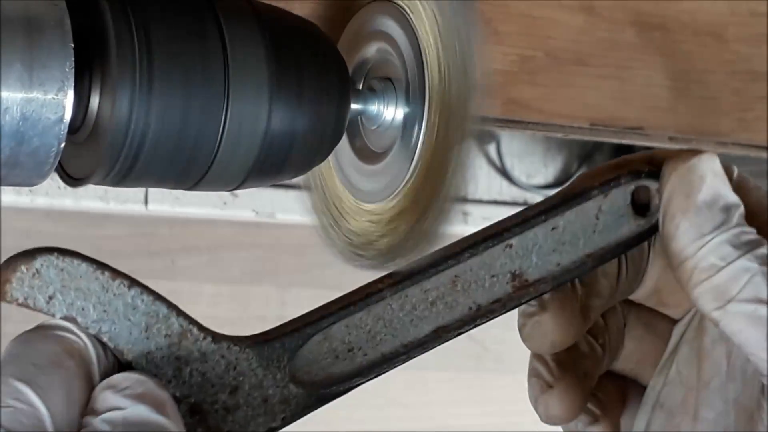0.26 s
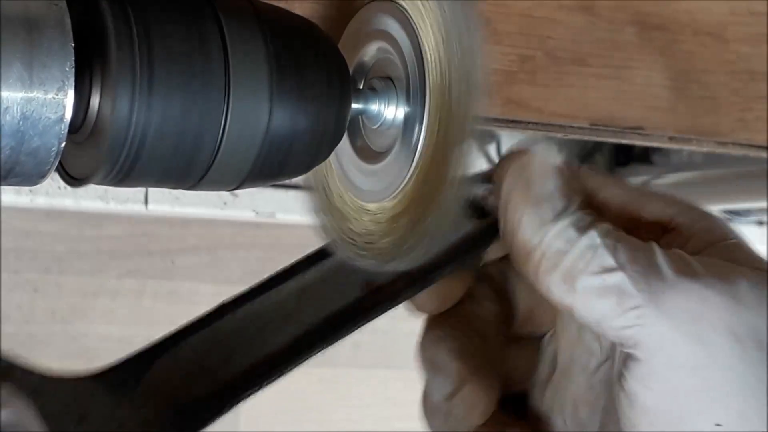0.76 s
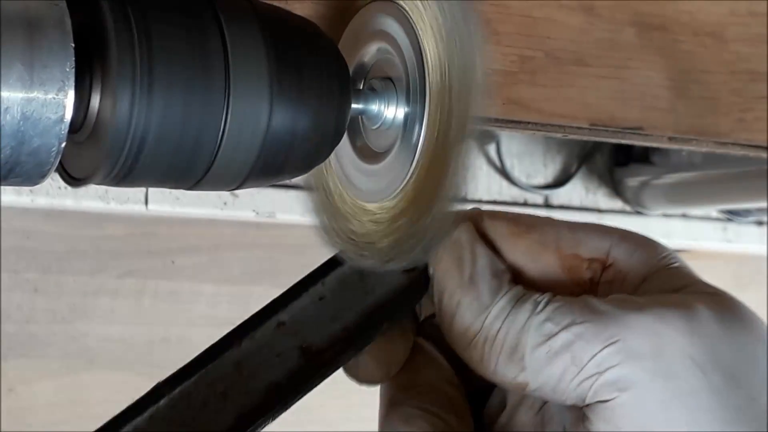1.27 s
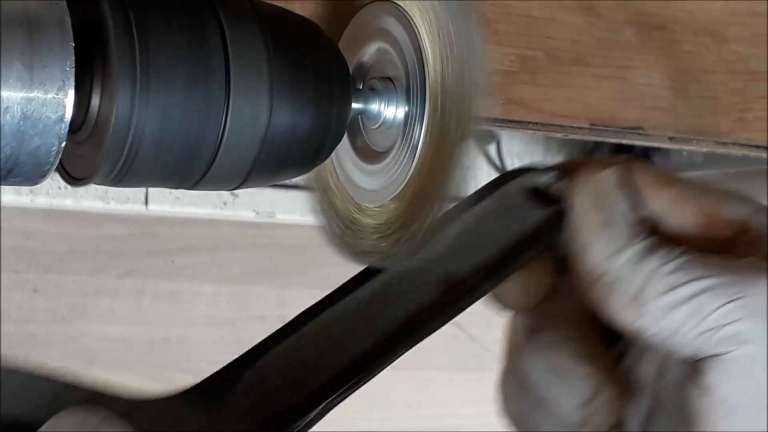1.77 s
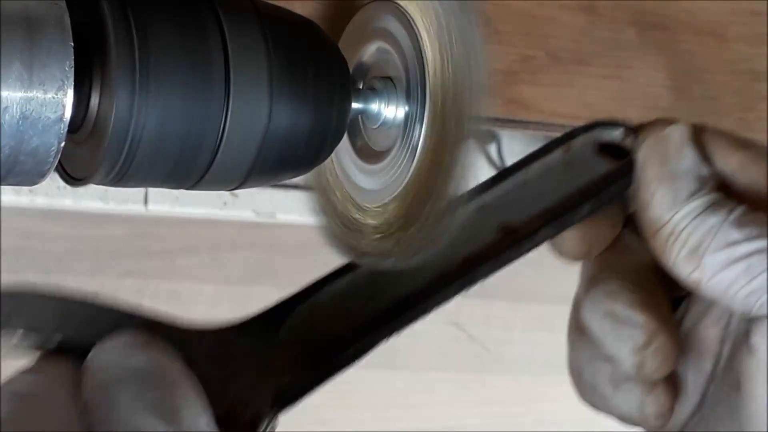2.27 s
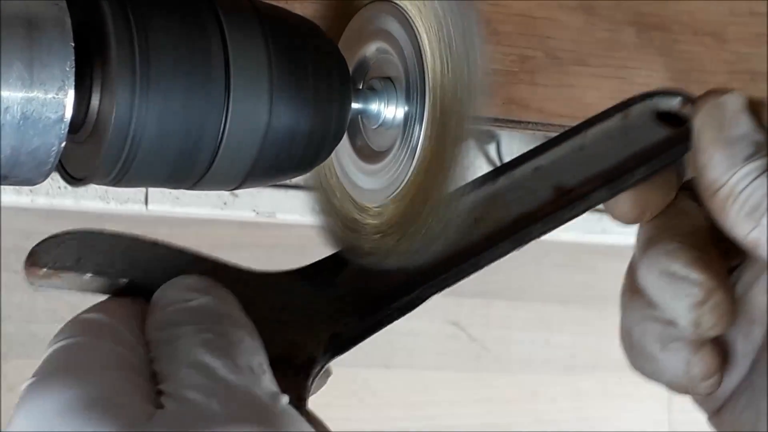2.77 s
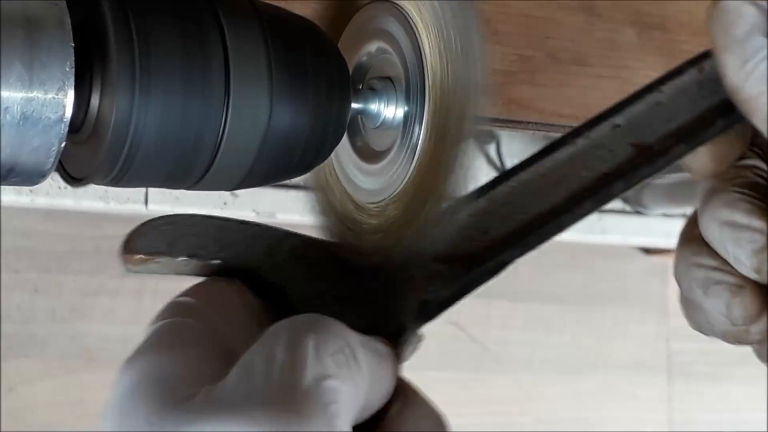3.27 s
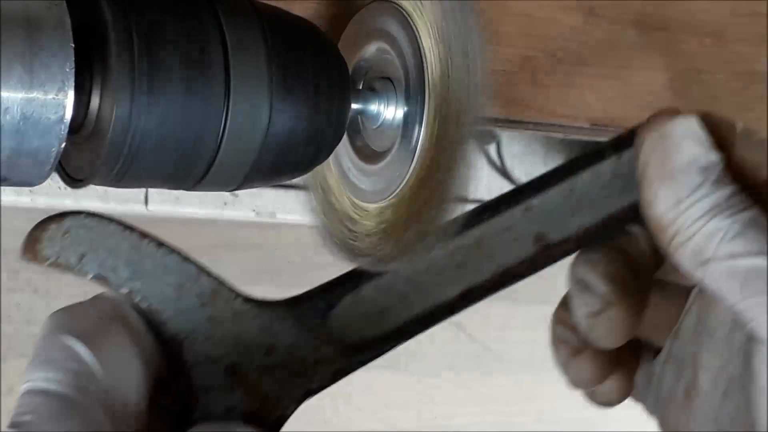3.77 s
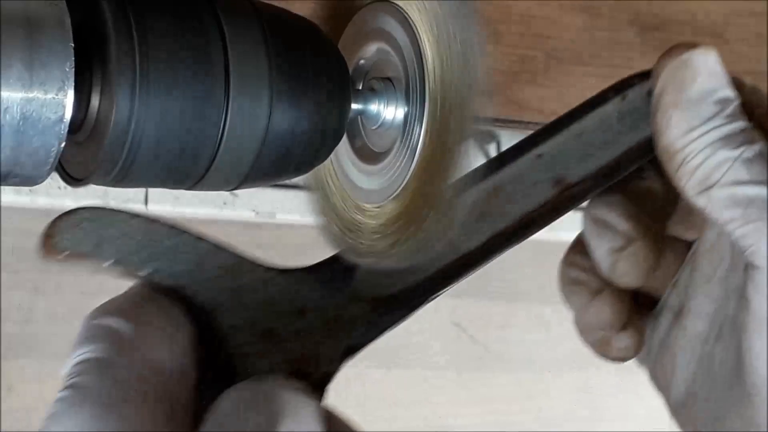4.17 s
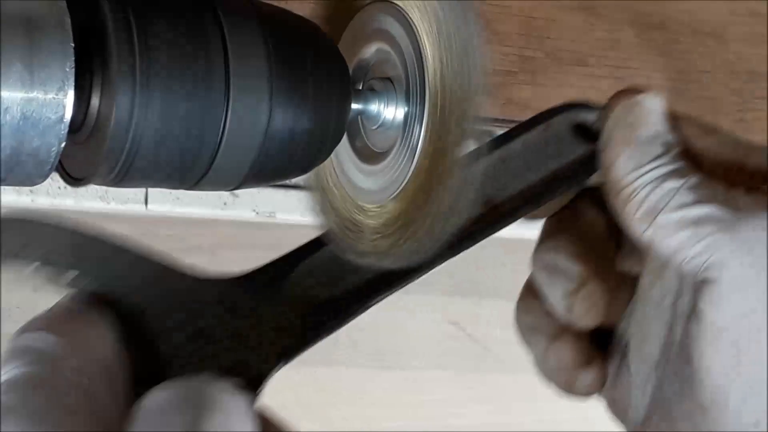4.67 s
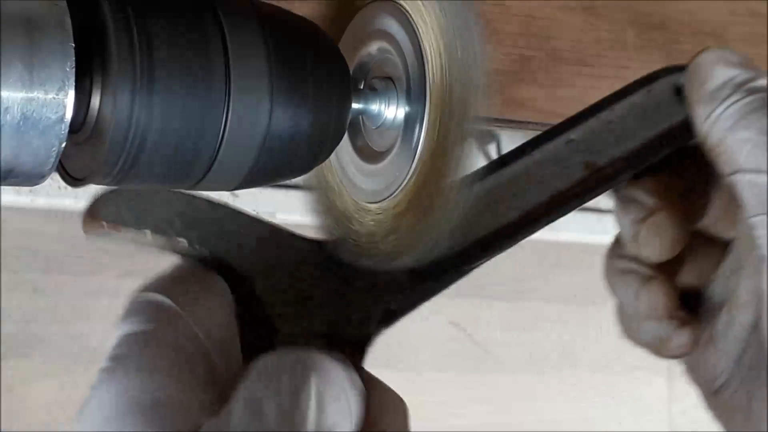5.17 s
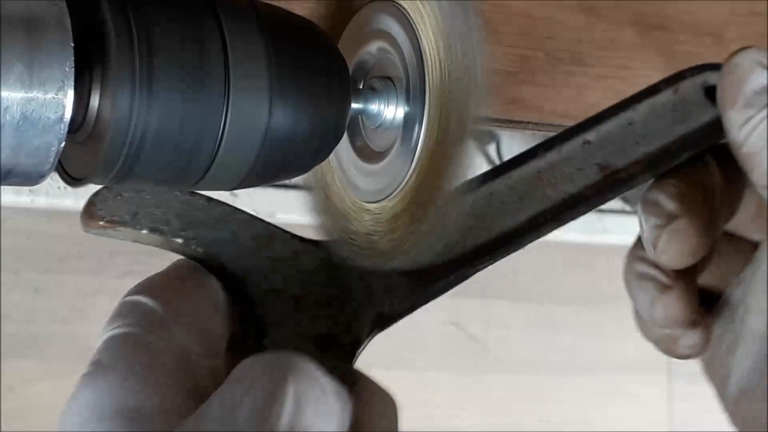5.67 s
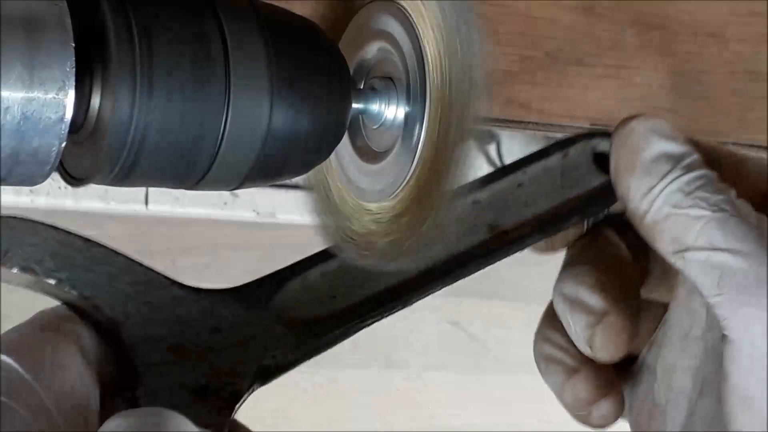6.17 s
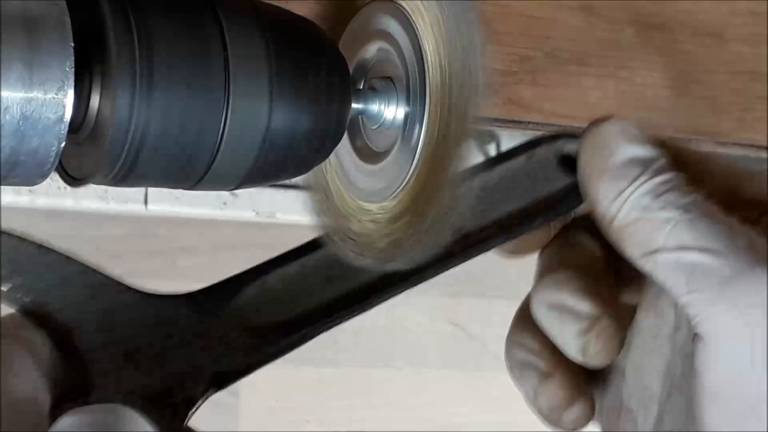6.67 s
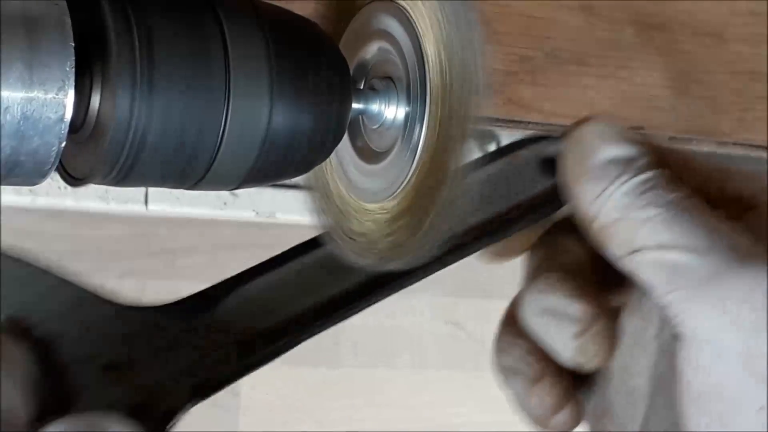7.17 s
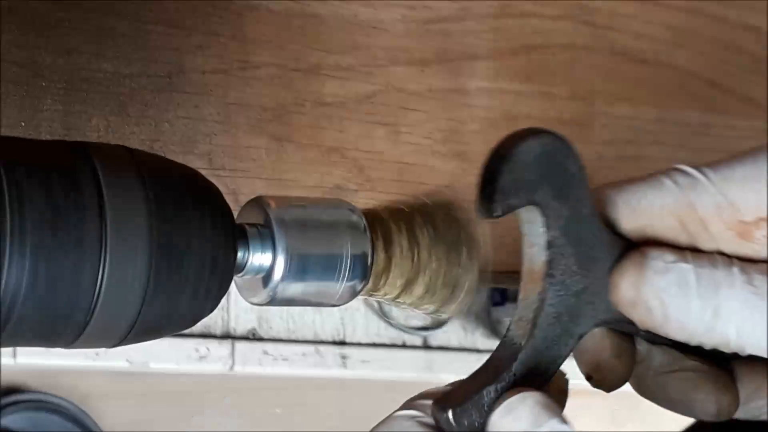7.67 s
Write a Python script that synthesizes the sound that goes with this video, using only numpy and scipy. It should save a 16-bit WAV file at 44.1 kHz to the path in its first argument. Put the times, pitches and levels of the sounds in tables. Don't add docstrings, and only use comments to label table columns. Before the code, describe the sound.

Dry, close workshop sound, almost the same at both ears. From 0 to 0.6 s a drill runs nearly unloaded: clear, steady mid and high whines over airy motor rush, with fan wind rumbling and popping low on the microphone. At about 0.6 s rusty steel meets the wire wheel; a dull gritty crackle peaks near 0.7 s, then bright hiss and metallic rasp continue. The pitch dips slightly, a low rotor hum swells and the gears grow rougher, wavering with every push up to 3.7 s. Around 3.75 s the pressure releases, speed rises and the scrape fades; from 4.1 s it bites again and scours on to 7.6 s with small surges and irregular air puffs. At 7.62 s a soft thump marks an abrupt change: a small end brush grinds lower and grittier under altered high whines until 7.9 s.

```python
import sys
import numpy as np
from scipy import signal
from scipy.fft import rfft, irfft, next_fast_len
from scipy.io import wavfile
from scipy.ndimage import map_coordinates

SR = 44100
rng = np.random.default_rng(int(sys.argv[2]) if len(sys.argv) > 2 else 0)


def store_pcm(level_fs):
    pcm = np.round(np.clip(level_fs, -1, 1) * 32767).astype(np.int16)
    wavfile.write(sys.argv[1], SR, np.atleast_2d(pcm).T)


def to_linear_factor(level_db):
    exponent = np.asarray(level_db, float) / 20
    return 10 ** exponent


N = 349713
FREE_HZ = 394.8
SWAP_S = 7.623
COARSE = 16


def seconds():
    return np.arange(N) / SR


def curves(rows):
    s, *columns = np.transpose(rows)
    return [np.interp(seconds(), s, column) for column in columns]


def wobble(rate):
    knots = rng.standard_normal(int(N * rate / SR) + 2)
    return np.interp(np.arange(N) * rate / SR, np.arange(len(knots)), knots)


def coloured(x, spectrum, modes=()):
    m = next_fast_len(N + 8192)
    f, db = np.transpose(spectrum)
    hz = np.fft.rfftfreq(m, 1 / SR)
    level_db = np.interp(np.log(hz + 1), np.log(f), db, left=-120)
    for centre, width, top_db in modes:
        level_db += top_db / (1 + (2 * (hz - centre) / width) ** 2)
    return irfft(rfft(x, m) * to_linear_factor(level_db), m)[:N] * np.sqrt(SR / 2)


def band(x, edges_hz):
    kept = signal.sosfilt(signal.butter(2, edges_hz, "band", fs=SR, output="sos"), x)
    return kept / kept.std()


# start_s, speed_turns_per_s
ROTOR_SPEED = [(0, 395.0), (.55, 394.6), (.64, 394.0), (.8, 391.7), (1.0, 394.0), (1.45, 393.1),
               (1.95, 394.2), (3.7, 393.8), (3.76, 397.4), (3.98, 396.3), (4.1, 393.6), (4.27, 392.2),
               (4.9, 394.9), (6.05, 393.4), (7.6, 394.6), (7.64, 395.0), (7.93, 395.1)]
# middle_s, speed_change_turns_per_s
HAND_WAVERS = [(1.29, 1.4), (1.4, 1), (1.79, -0.97), (2.09, 0.97), (2.19, 0.55), (2.33, -1.24), (2.51, 1.3),
               (2.58, -1.73), (2.66, 1.26), (2.87, -0.64), (2.98, 0.76), (3.13, 0.86), (3.21, 1.16),
               (3.3, 0.65), (3.37, 1.5), (3.54, 1.2), (4.17, 1.235), (4.35, 0.67), (4.85, -0.533),
               (5.2, -0.96), (5.3, -0.6), (5.39, -0.55), (5.5, 2), (5.661, 0.55), (5.89, 1.76),
               (6.34, 0.61), (6.52, 0.75), (7.45, -0.75)]
# start_s, gear_load (0-1.4), wire_contact (0-1)
HAND_PUSH = [(0, 0.1, 0.1), (.56, 0, 0.26), (.62, 0.26, 0.65), (.8, 0.76, 1.05), (1.0, 0.43, 1.05),
             (1.45, 0.88, 0.63), (1.95, 0.7, 1), (2.45, 0.99, 1.0), (3.725, 1.15, 0.79), (3.755, .15, 0.26),
             (3.98, 0, 0), (4.1, 0.41, 0.46), (4.27, 1.05, 0.93), (4.9, 0.98, .9), (6.05, 1.22, 0.89),
             (7.618, 1.02, 0.84), (7.626, .15, 0.62), (7.93, 0.2, .45)]


def hand():
    waver_s, load_per_turn, skip_load = .045, .13, .19
    skips_per_s, skip_from, skip_turns = 28, .65, 2.3
    t = np.arange(0, N + COARSE, COARSE) / SR
    waver = sum(turns * np.exp(-((t - s) / waver_s) ** 2) for s, turns in HAND_WAVERS)
    waver = waver.repeat(COARSE)[:N]
    load, contact = curves(HAND_PUSH)
    skip = skip_turns * np.clip(load, 0, 1) * np.maximum(wobble(skips_per_s) - skip_from, 0)
    press = np.clip(load * (1 - load_per_turn * waver - skip_load * skip), 0, 1.6)
    return press, np.clip(contact, 0, 2), curves(ROTOR_SPEED)[0], waver, skip


def rotor_time(press, turns):
    stumble = (.2 + press) * .0005 * wobble(40)
    return np.cumsum(turns / FREE_HZ + stumble) / SR


# pitch_hz, level_db_per_hz
DRAUGHT_SPECTRUM = [(15, -66), (30, -37), (55, -22.5), (110, -2), (190, 1), (330, -4), (500, -10.5),
                    (700, -28), (2000, -55)]
# start_s, level_db
FAN_AIR = [(0, -31.5), (.6, -33.5), (.95, -29), (1.6, -34.5), (2.65, -36), (4.05, -29.5), (6.5, -31),
           (7.2, -32.5), (7.93, -31.5)]
# middle_s, peak_db, pitch_hz
AIR_POPS = [(.023, -13.5, 306), (0.07, -11, 302), (.483, -12, 230), (.854, -12.5, 200), (.978, -7, 292),
            (1.1, -10.5, 330), (1.298, -8.5, 348), (1.353, -13.5, 301), (1.51, -12.5, 227),
            (2.776, -14, 280), (3.968, -10.5, 229), (4.148, -11, 272), (4.17, -8.5, 253.8),
            (4.232, -14, 308), (4.752, -10.5, 374), (5.01, -13, 213.7), (5.128, -15, 279), (5.33, -10, 404),
            (5.389, -11, 403), (6.1, -12, 311), (6.192, -8, 410), (6.433, -8.5, 379.3), (6.59, -11, 220),
            (6.64, -13, 205), (7.343, -10.5, 247), (7.608, -12, 228), (7.642, -10, 200),
            (7.674, -10.5, 278), (7.816, -7, 293.5), (7.912, -8, 250.4)]


def pop(hz, turn):
    t = np.arange(-SR // 50, SR // 50) / SR
    body = np.exp(-(t * hz / .48) ** 2) * np.cos(2 * np.pi * hz * t + turn)
    edge = np.exp(-(t * hz / .85) ** 2) * np.cos(2 * np.pi * 2.24 * hz * t + turn)
    return body + to_linear_factor(-15) * edge


def draught():
    small_count, small_over_db = 45, 16
    thump_db, thump_s = -26, .002
    lumps = to_linear_factor(4.8 * wobble(70) + 2.4 * wobble(18))
    rumble = coloured(rng.standard_normal(N) * lumps, DRAUGHT_SPECTRUM)
    air_db, = curves(FAN_AIR)
    small = []
    for when, size, pitch in rng.random((small_count, 3)):
        peak_db = air_db[int(when * N)] + small_over_db + 2 * size
        small.append((when * N / SR, peak_db, 140 + 140 * pitch))
    length = len(pop(200, 0))
    out = np.zeros(N + 2 * length)
    for s, db, hz in list(AIR_POPS) + small:
        start = round(s * SR) + length // 2
        out[start:start + length] += to_linear_factor(db) * pop(hz, turn=rng.normal(1.68, 1))
    low_cut = signal.butter(2, 75, "high", fs=SR, output="sos")
    pops = signal.sosfiltfilt(low_cut, out)[length:-length]
    thump = to_linear_factor(thump_db) * np.exp(-((seconds() - SWAP_S) / thump_s) ** 2)
    return to_linear_factor(air_db + 3.5) * rumble / rumble.std() + pops + thump


# pitch_hz, level_db_per_hz
RUSH_SPECTRUM = [(400, -64), (1000, -71), (1400, -69), (1600, -62.5), (2400, -65), (3200, -61), (4000, -62),
                 (5000, -58.5), (7000, -59), (8500, -58), (10300, -62), (10700, -69), (12200, -73.5),
                 (14500, -67)]
# pitch_hz, width_hz, level_db
BENCH_DIPS = [(620, 160, -3), (1950, 120, -3), (2220, 120, -3), (2650, 250, -4), (3600, 300, -4),
              (4400, 280, -5), (5120, 120, -4), (6050, 350, -4), (7500, 250, -4), (8200, 300, -4),
              (8950, 200, -4), (9950, 200, -2)]


def motor(clock):
    size = round(9 * SR / FREE_HZ)
    place = clock * FREE_HZ / 9 * size % size
    repeat = map_coordinates(rng.standard_normal(size), [place], mode="grid-wrap")
    share = .42
    mix = share * repeat + np.sqrt(1 - share ** 2) * rng.standard_normal(N)
    return coloured(mix * to_linear_factor(1.1 * wobble(40)), RUSH_SPECTRUM, BENCH_DIPS)


# low_hz, high_hz
RUST_BAND = (1110, 2600)
# low_hz, high_hz
GRIND_BAND = (1050, 1420)


def crust():
    touch_s, lasts_s, touch_db, grind_db = .73, .18, -33, -40
    t = seconds()
    grit = rng.standard_normal(N) * to_linear_factor(3 * wobble(900))
    touch = to_linear_factor(touch_db) * np.exp(-((t - touch_s) / lasts_s) ** 2)
    return touch * band(grit, RUST_BAND) + to_linear_factor(grind_db) * (t > SWAP_S) * band(grit, GRIND_BAND)


# pitch_hz, level_db_per_hz
SCRAPE_SPECTRUM = [(500, -65.5), (1000, -70.5), (1400, -73), (1600, -63.5), (2500, -65.5), (3200, -61.5),
                   (3600, -60.5), (5000, -55.5), (6000, -60.5), (8500, -53.5), (10200, -56.5), (10700, -68),
                   (12200, -67), (15500, -64.5)]
# pitch_hz, width_hz, level_over_scrape_db
STEEL_RINGING = [(3900, 250, 3), (4800, 300, 5.5), (5450, 300, 4.5), (6900, 500, 2), (7850, 200, 4),
                 (8600, 250, 3), (9650, 400, 4)]


def wires(contact):
    strokes = np.array([1.16 * contact, .9 * contact ** .42])
    own_db = np.array([wobble(14), wobble(16)])
    grain_db = 2.16 * wobble(1500) + .51 * wobble(45) + .62 * own_db
    tips = strokes * rng.standard_normal((2, N)) * to_linear_factor(grain_db)
    rasp = signal.sosfilt(signal.butter(4, 6050, "low", fs=SR, output="sos"), tips[0])
    hiss = signal.sosfilt(signal.butter(4, 6050, "high", fs=SR, output="sos"), tips[1])
    return coloured(rasp + hiss, SCRAPE_SPECTRUM, STEEL_RINGING + BENCH_DIPS)


def tone(hz, clock, unsteady_db, blur):
    steps = np.arange(0, N, COARSE) / SR

    def chance(rate):
        return np.interp(steps * rate, np.arange(400), rng.standard_normal(400))

    slip = blur[::COARSE] * (.2 + hz / 8000) * chance(30) + 2 * np.pi * rng.random()
    size = (np.sqrt(2) * to_linear_factor(unsteady_db * chance(16))).astype("f4")[:, None]
    phase = 2 * np.pi * hz * clock[::COARSE] + slip
    start, step = np.array([phase % (2 * np.pi), np.gradient(phase) / COARSE], "f4")[:, :, None]
    return (size * np.sin(start + step * np.arange(COARSE, dtype="f4"))).ravel()[:N]


def hum(clock, contact, blur):
    level_db, idle, swell_db, beat_s, top_s = -37.5, .19, 1.5, 1.71, 2.74
    beat = np.cos(2 * np.pi * (seconds() - top_s) / beat_s)
    size = to_linear_factor(level_db + swell_db * beat) * (idle + contact)
    return size * tone(FREE_HZ, clock, unsteady_db=2.2, blur=.6 + 4.5 * blur)


# pitch_hz at free speed, free_db, pressed_db, end_brush_db
ROTOR_TONES = [(393, -45, -36, -42), (790, -44, -41.5, -47), (877, -44, -45, -49), (1493, -50, -48, -33),
               (1666, -40, -39, -41), (1755, -48, -45, -52), (2284, -42, -44, -36), (2457, -41, -44, -42),
               (2850, -41, -39, -39), (3074, -43, -44, -35), (3247, -42, -44, -33), (3950, -45, -36, -41),
               (5444, -43, -39, -38), (5531, -30.5, -33, -34), (5701, -36, -36, -36), (6233, -37, -35, -42),
               (6320, -39, -35, -45), (7197, -39, -40, -36), (7726, -33, -38, -36), (7814, -23, -28, -29),
               (7989, -60, -60, -27), (7900, -36, -27, -31), (8605, -31, -32, -30), (8777, -33, -32, -32),
               (9393, -30, -33, -27), (9481, -32, -31, -33), (10357, -33, -36, -32)]
# pitch_hz at free speed, free_db, pressed_db, end_brush_db
GEAR_TONES = [(459, -53, -42, -43), (953, -56, -56, -45), (1190, -56, -56, -50), (1614, -46, -41, -49),
              (1712, -52, -42, -52), (2062, -56, -56, -43), (2976, -44, -41, -41), (3099, -39, -38, -34),
              (3226, -40, -37, -37), (3422, -52, -39, -60), (3849, -46, -38, -44), (4938, -53, -25.3, -50),
              (4986, -50, -33.5, -48), (5036, -52, -28, -47), (5297, -56, -56, -39), (6650, -48, -38, -38),
              (6803, -38, -46, -42), (7592, -41, -51, -35), (8550, -27, -27, -25), (10181, -40, -47, -34),
              (10973, -41, -49, -59), (11146, -44, -42, -48), (11405, -47, -45, -46),
              (14014, -46, -50, -42), (14252, -42, -46, -41)]


def gears(clock, press, blur):
    out, swap = np.zeros(N), round(SWAP_S * SR)
    free, pressed = np.clip(1 - press, 0, 1), np.minimum(press, 1.4)
    for hz, free_db, pressed_db, end_db in ROTOR_TONES[1:] + GEAR_TONES:
        size = to_linear_factor(free_db) * free + to_linear_factor(pressed_db - 1.55 - .48 * (hz > 5100)) * pressed
        size[swap:] = to_linear_factor(end_db - 1)
        out += size * tone(hz, clock, unsteady_db=2.3, blur=blur)
    return out


def whine_levels(rules, press, slow, waver):
    regrip_s, end_fade_db_per_s = 4.1, 30
    t = seconds()
    braking = np.maximum(FREE_HZ - slow, -.3) - waver
    racing = np.clip(slow - FREE_HZ - .5, 0, 1)
    gripped = np.clip((t - regrip_s) / .15, 0, 1)
    end_db = end_fade_db_per_s * np.maximum(t - SWAP_S, 0)
    levels = []
    for rest_db, load_db, brake_db, race_db, slide_db, grip_db in rules:
        hand_db = load_db * press + brake_db * braking + race_db * racing
        levels.append(rest_db + hand_db + slide_db * t + grip_db * gripped - end_db)
    return levels


CRY_PITCHES = (9570, 7989)
# rest_db, load_db, braking_db_per_turn, racing_db, slide_db_per_s, new_grip_db
CRY_RULES = [(-30, 2.6, 3.75, 7.6, 0.092, 4.1), (-34, 6.2, 2.2, 4.2, 0.25, 1.3)]


def cries(clock, press, slow, waver, blur):
    out = np.zeros(N)
    for hz, level_db in zip(CRY_PITCHES, whine_levels(CRY_RULES, press, slow, waver)):
        power = np.clip(to_linear_factor(level_db) ** 2 - to_linear_factor(-31) ** 2, 0, None)
        size = to_linear_factor(-40) + np.sqrt(power)
        out += to_linear_factor(.8) * size * tone(hz, clock, unsteady_db=2.5, blur=.7 * blur)
    return out


WHINE_PITCHES = (1580, 3160)
# rest_db, load_db, braking_db_per_turn, racing_db, slide_db_per_s, new_grip_db
WHINE_RULES = [(-29, -0.24, -1.85, 3.5, -0.44, 1.5), (-24, -2.2, -1.14, -5, -0.75, 2)]


def whines(clock, press, slow, waver, blur):
    out = np.zeros(N)
    for hz, level_db in zip(WHINE_PITCHES, whine_levels(WHINE_RULES, press, slow, waver)):
        out += to_linear_factor(level_db + 1.8) * tone(hz, clock, unsteady_db=.6, blur=.3 * blur)
    return out


def scene():
    press, contact, slow, waver, skip = hand()
    clock = rotor_time(press, slow + waver + .25 * skip)
    blur = .1 + .55 * press
    quick = waver + skip
    mono = draught() + motor(clock) + crust() + wires(contact)
    mono += hum(clock, contact, blur) + gears(clock, press, blur)
    mono += cries(clock, press, slow, quick, blur) + whines(clock, press, slow, quick, blur)
    return np.array([mono, mono])


def low_pass(x):
    return signal.sosfilt(signal.butter(12, 16760, fs=SR, output="sos"), x)


def record(dry):
    knee, top_hz = 1.15, 15750
    bent = dry / (1 + np.abs(dry / knee) ** 6) ** (1 / 6)
    m = next_fast_len(N)
    passed = np.fft.rfftfreq(m, 1 / SR) < top_hz
    mix = irfft(rfft(bent, m) * passed, m)[:, :N]
    return low_pass(mix)


dry = scene()
out = record(dry)
store_pcm(out)
```